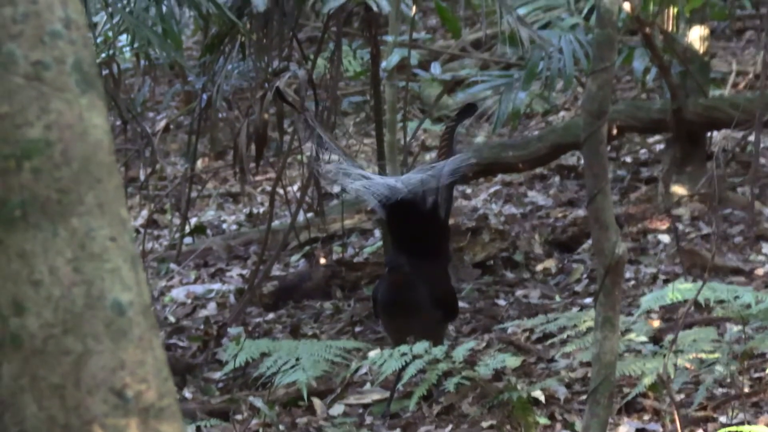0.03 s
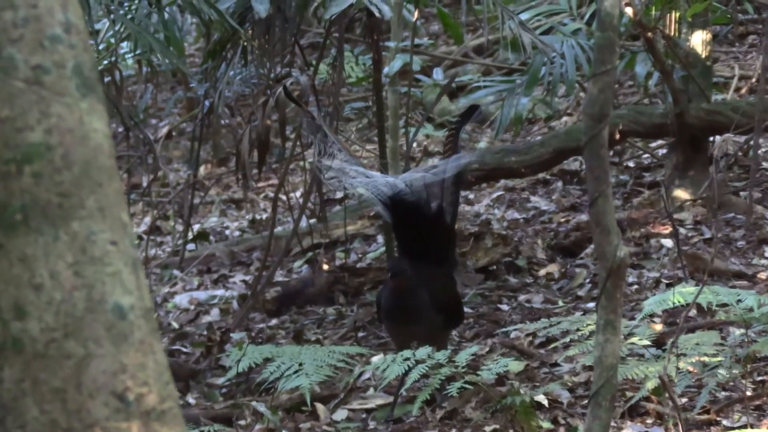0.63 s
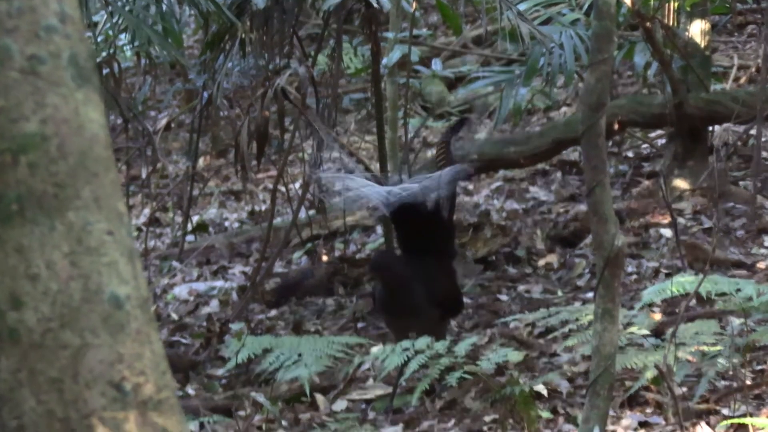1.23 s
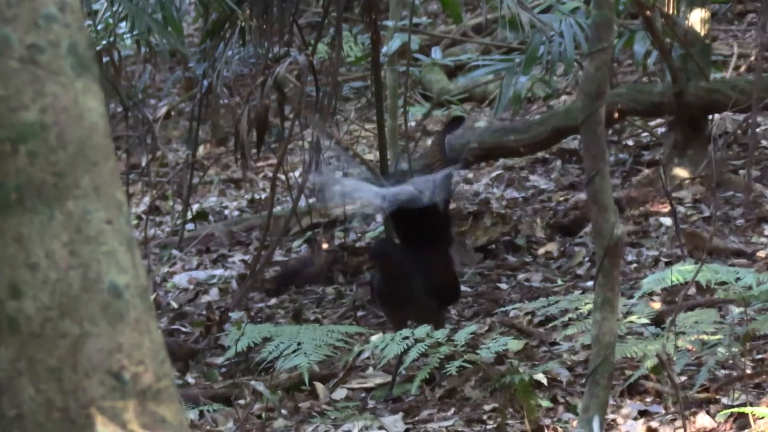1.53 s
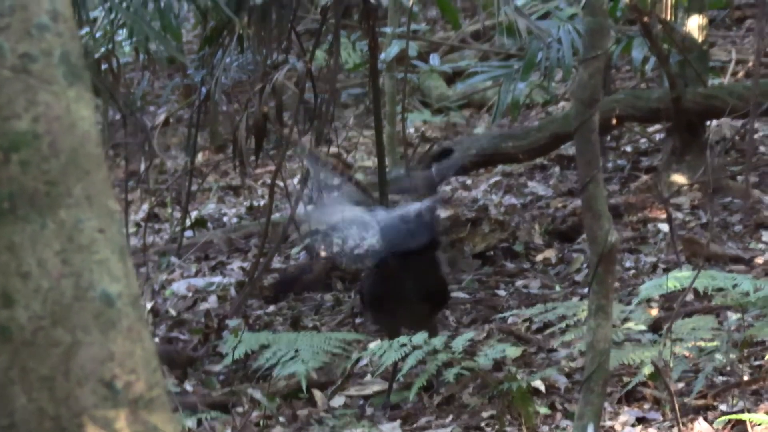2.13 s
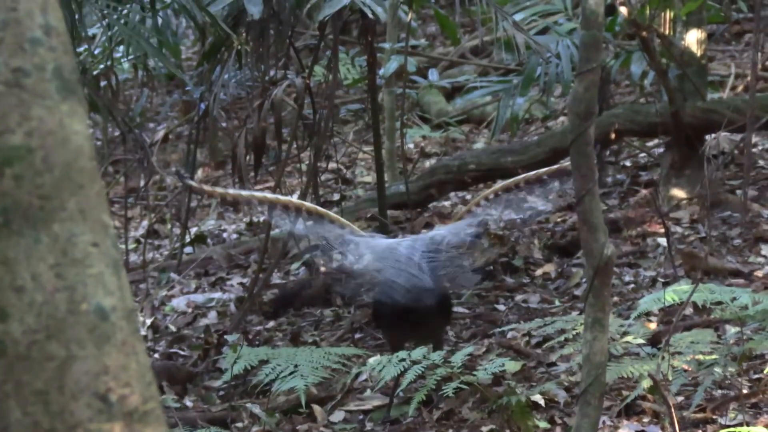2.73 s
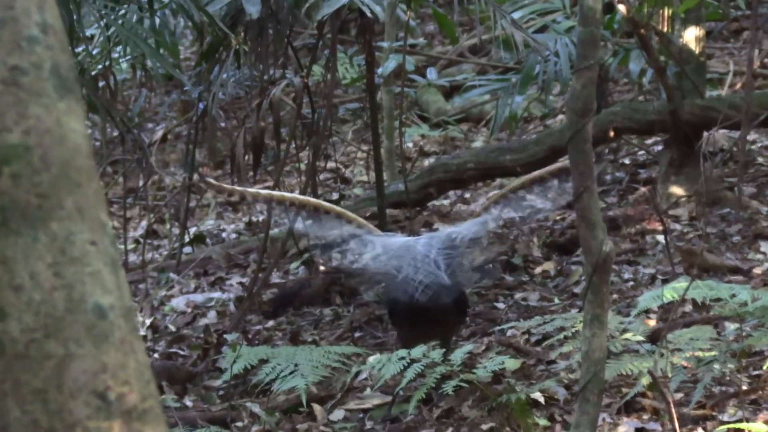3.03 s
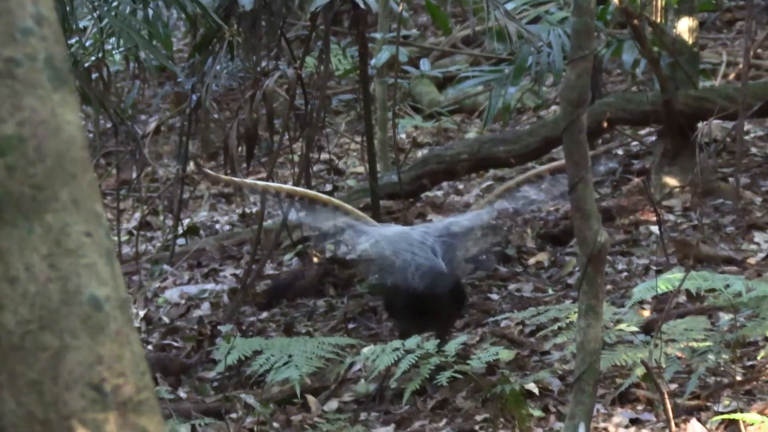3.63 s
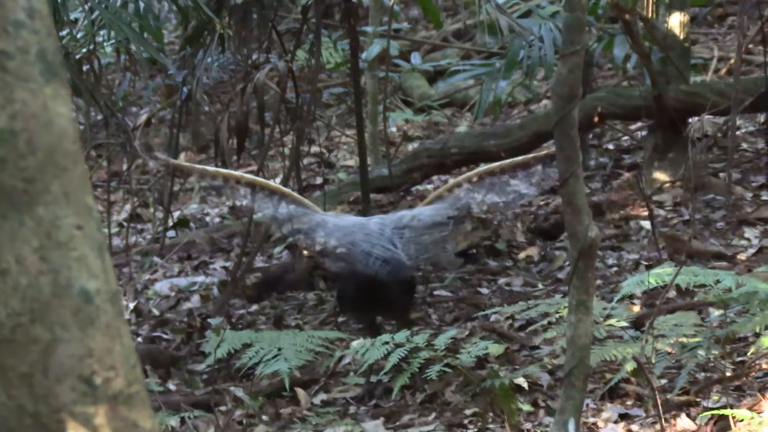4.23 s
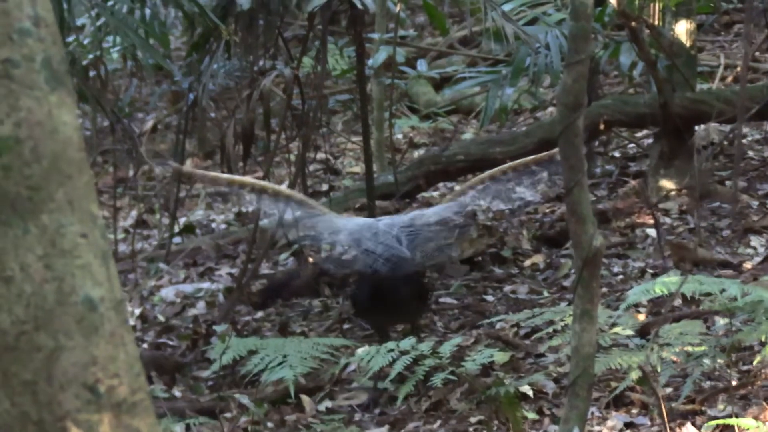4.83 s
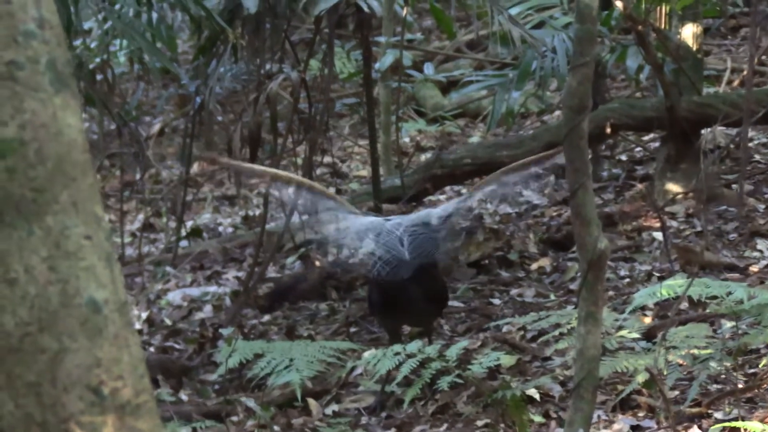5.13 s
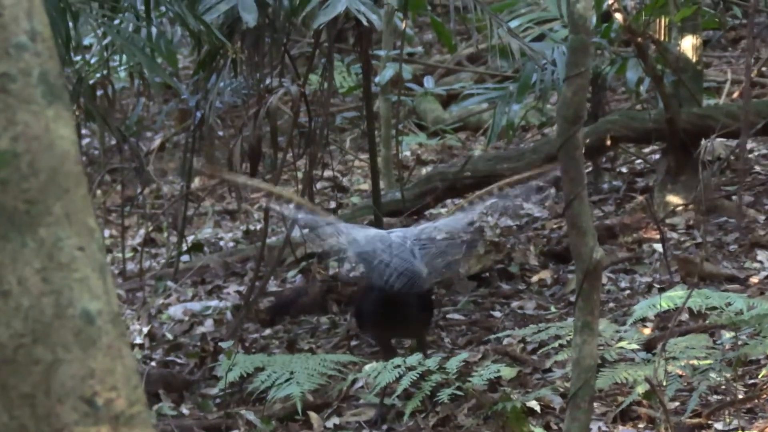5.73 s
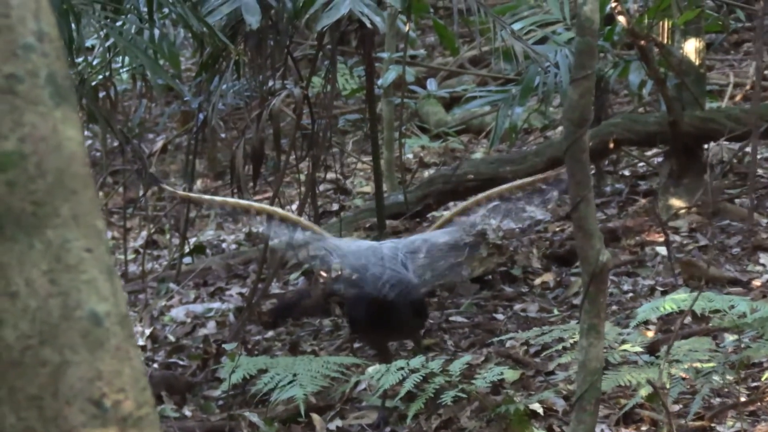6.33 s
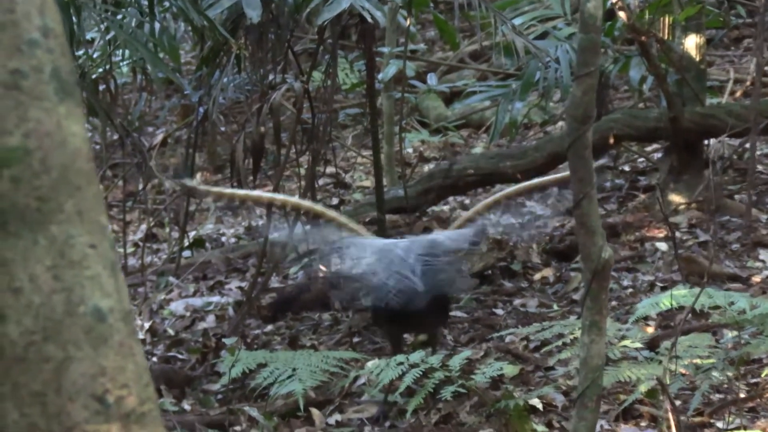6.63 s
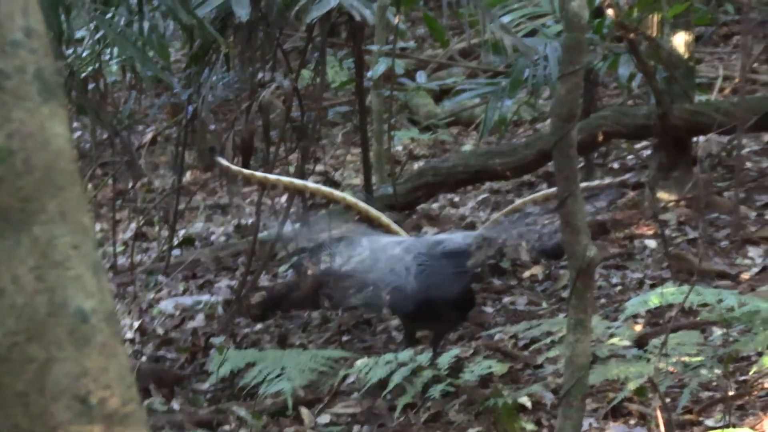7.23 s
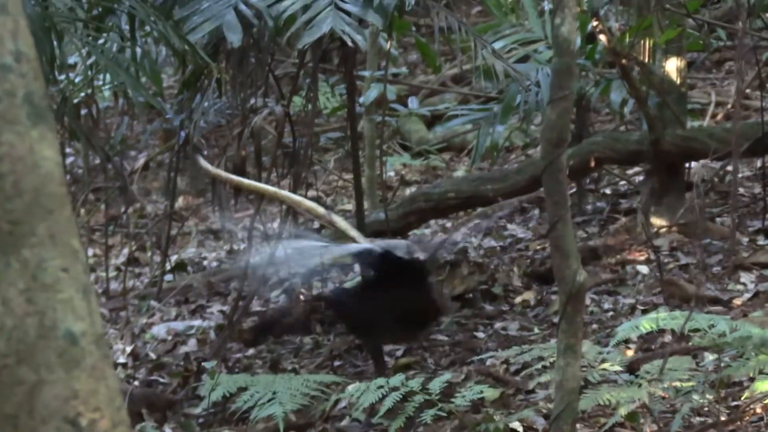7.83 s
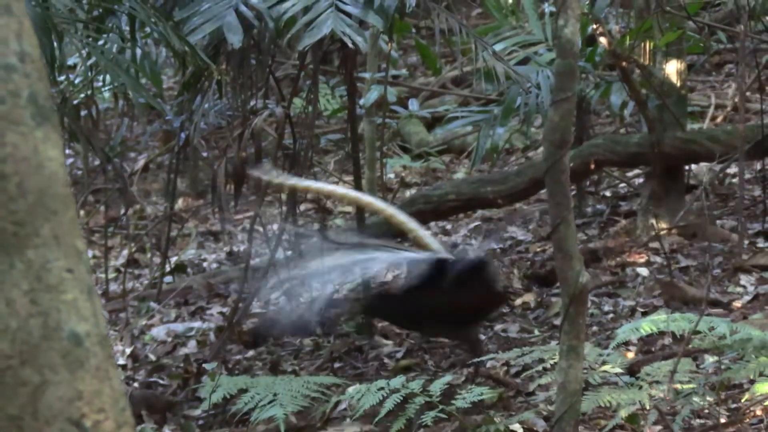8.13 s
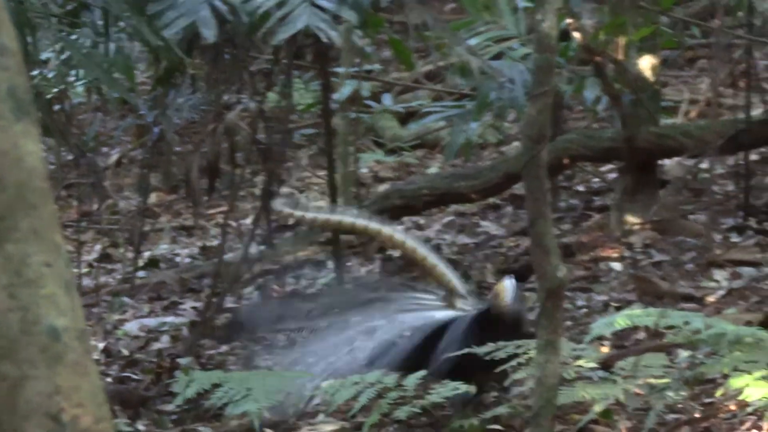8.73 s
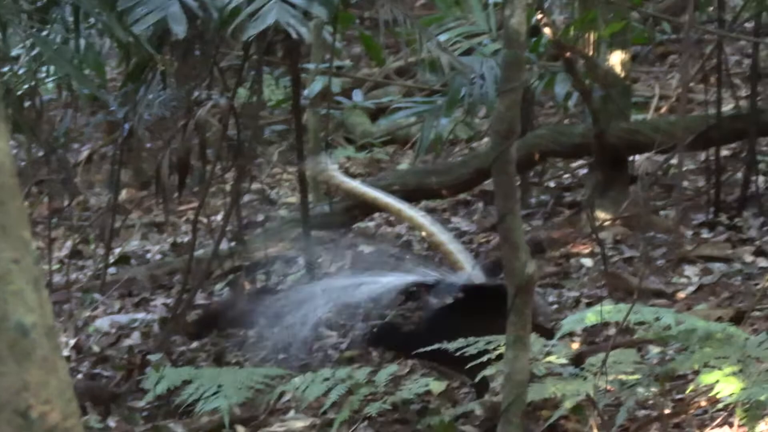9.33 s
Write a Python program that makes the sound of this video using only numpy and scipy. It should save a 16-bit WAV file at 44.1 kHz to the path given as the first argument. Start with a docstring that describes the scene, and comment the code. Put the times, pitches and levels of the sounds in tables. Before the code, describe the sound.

A soft rainforest hush with a faint low rumble runs throughout. For the first two seconds a lyrebird, straight ahead of the microphone, makes quiet throaty clucks and small rustles in the leaves, then a thin high chip. From about 2.5 to 4.8 seconds it gives a fast, even run of eleven calls, nearly five a second, each a whip-like snap, a metallic buzz and a rising whoop. Its feathers swish faintly around 5 seconds. A second run of seven, with harder snaps, lasts from 5.6 to 7 seconds. At 7.5 and 8 seconds come two loud ringing calls, each a high yelp with a quick falling trill, echoing for about a second among the trunks. From 8.6 to 9.4 seconds the bird steps through dry leaves and twigs with short crunches and a light swishing.

```python
"""Rainforest floor, a lyrebird displaying straight ahead of a stereo microphone. Soft clucks and thin
chips, two runs of snap-buzz-whoop, then two loud ringing calls: the whistles are nearly pure syrinx
tones, the clucks and buzzes rasp through throat resonances. Tail feathers swish between the runs and
the bird steps off through dry leaves. Near stems answer at once and far trunks scatter its sounds into
a long tail; behind it all lie the forest hush and a low rumble."""
import sys
import numpy as np
from scipy import signal
from scipy.fft import rfft, irfft, next_fast_len
from scipy.io import wavfile

SR = 44100
rng = np.random.default_rng(int(sys.argv[2]) if len(sys.argv) > 2 else 0)


def dump(signal):
    """Clip the signal to [-1, 1] and save it as 16-bit WAV at the path in sys.argv[1]."""
    limited = np.clip(np.atleast_2d(signal).T, -1, 1)
    pcm = np.round(limited * 32767).astype(np.int16)
    wavfile.write(sys.argv[1], SR, pcm)


N = 413216
TIME = np.arange(N) / SR

# one row a whoop: snap t/s, force/dB, crest of the glide after the snap/s, steep part of the glide/s
WHOOPS = [(2.4724, -34, 0.13, 0.029), (2.7043, -9, 0.11, 0.025), (2.9189, -10.5, 0.11, 0.017),
          (3.1308, -11, 0.11, 0.016), (3.346, -7, 0.11, 0.023), (3.5616, -5.5, 0.11, 0.013),
          (3.7711, -7.5, 0.11, 0.019), (3.9902, -10.5, 0.11, 0.021), (4.1982, -7, 0.11, 0.019),
          (4.41, -4.5, 0.11, 0.016), (4.6305, -8, 0.1, 0.02), (5.586, -20.5, .121, 0.018),
          (5.811, -4, .118, 0.023), (6.0329, -2.5, 0.11, 0.017), (6.2505, -1, .11, 0.021),
          (6.4613, -4.5, 0.11, 0.019), (6.6743, -5, 0.11, 0.019), (6.886, -5, 0.098, 0.014)]
# modes of the snap: f/Hz, level/dB, t60/s
SNAP_MODES = [(1564, -1.5, 0.0058), (2170, 11.5, 0.0029), (4050, 2, 0.0041), (6260, -25.5, 0.0013),
              (8070, -14, 0.0034)]
# the two loud calls: yelp t/s, starting f/Hz of the lead note, closing slur after the yelp/s
RINGING_CALLS = [(7.5169, 1710, .087), (8.0334, 1520, .08)]
# thin high chips: t/s, length/s, start f/Hz, middle f/Hz, end f/Hz, level/dB
CHIPS = [(0.02, 0.028, 6370, 5360, 4700, -46), (2.1062, 0.013, 6740, 5310, 7000, -15),
         (2.115, .012, 6100, 6950, 7000, -26), (2.296, .013, 7360, 7200, 7150, -34)]
# soft low murmurs: t/s, length/s, start f/Hz, end f/Hz, level/dB
MURMURS = [(.514, 0.015, 410, 450, -39), (.567, 0.016, 400, 470, -43), (1.004, 0.014, 537, 440, -38),
           (1.417, 0.024, 1380, 850, -38)]
# throaty clucks: t/s, length/s, start f/Hz, end f/Hz, level/dB, roughness 0-1
CLUCKS = [(.005, 0.04, 955, 784, -49, 0.7), (0.223, 0.023, 727, 770, -49, 0.4),
          (0.304, 0.026, 793, 695, -51.5, 0.6), (0.526, 0.019, 471, 427, -39, 0.76),
          (0.625, 0.032, 710, 623, -49, 0.5), (0.738, 0.031, 750, 1020, -44, 0),
          (0.784, 0.023, 868, 790, -42, 0.5), (0.869, 0.029, 434, 480, -31, 0.44)]
# feet on twigs and leaf litter: t/s, level/dB, decay of the crunch/s, treble limit f/Hz
STEPS = [(0.107, -36.5, 0.015, 12000), (.923, -33, 0.0047, 10000), (1.156, -43, .006, 8000),
         (1.216, -39, 0.0075, 8000), (1.69, -40.5, 0.0034, 8000), (1.769, -35.5, .01, 10000),
         (7.182, -41, 0.0067, 10000), (8.576, -30.5, 0.0017, 2400), (8.626, -18, 0.004, 7000),
         (8.793, -30, 0.0062, 7000), (9.0288, -20, 0.00099, 2420), (9.0836, -14.5, 0.004, 7000),
         (9.158, -27.5, 0.003, 9000), (9.237, -25.5, .0064, 8700), (9.331, -15.5, 0.0084, 3800)]
# feathers and leaves swishing: t/s, attack/s, hold/s, release/s, level/dB
SWISHES = [(0.099, .008, .004, .03, -43), (0.884, 0.044, .004, 0.018, -47.5),
           (1.75, 0.034, 0.082, 0.089, -52), (2.03, 0.076, .005, .01, -56),
           (4.92, .008, 0.028, 0.28, -44.5), (5.209, 0.066, 0.079, .035, -47),
           (7.064, 0.064, 0.056, 0.081, -51.5), (8.572, 0.0085, .16, 0.056, -51.5),
           (9.02, .01, 0.16, 0.098, -47.5)]
# contour of the rumble that swells while the bird dances: t/s, relative level/dB
RUMBLE_SWELL = [(0.0, -65), (0.42, -61.5), (2.27, -67), (2.92, -60), (3.18, -61.5), (8.92, -60),
                (9.37, -55)]

# harmonics of each tone, from the fundamental up: level/dB
WHOOP_HARMONICS = [-1, -76, -17.5, -78, -57]
SQUEAK_HARMONICS = [-11.5, 0, -13.5, -23]
YELP_HARMONICS = [-2.5, -23, -40, -41, -43]
PIP_HARMONICS = [-3.5, -32.5, -67, -41.5]
NOTE_HARMONICS = [-4, -30, -47, -49.5, -42.5, -35.5, -56]

# resonances of throat, beak and woody litter: f/Hz, width/Hz, level/dB
BUZZ_THROAT = [(1436, 193, 7), (2510, 110, 10.5), (4100, 2300, 1.5), (5130, 1240, 7), (7740, 600, 1.5),
               (12000, 3200, -19)]
CLUCK_THROAT = [(450, 120, -14), (890, 330, 12), (1740, 360, 20), (2650, 630, 2.5), (5150, 1100, -45)]
BEAK_MODES = [(10800, 4000, 7)]
TWIG_MODES = [(268, 31, -8), (539, 47, -2), (943, 610, -1.5), (1810, 650, 2.5), (2380, 700, 1),
              (4340, 1370, -8), (8540, 2800, -12.5)]

# noise spectra of call rasp, swish and hiss, forest hush and rumble: f/Hz, relative level/dB
SPRAY_COLOUR = [(2500, -7), (4000, 9.5), (8000, -3), (11000, -7), (14000, -15), (16000, -32)]
SWISH_COLOUR = [(530, -44), (900, -16), (1240, -24), (1290, -22), (1590, -8), (1820, -11.5), (2420, 5.5),
                (2930, -1.5), (3180, 2), (5700, -1.5), (9180, -13.5), (15500, -36)]
HUSH_COLOUR = [(15, -44), (25, -23.5), (170, -5.5), (437, -6.5), (500, -3.5), (637, -5.5), (1280, -7.5),
               (1390, -7.5), (1510, -9.5), (1640, -7), (2330, -15), (3780, -13.5), (7220, -20),
               (8730, -21.5), (15800, -37)]
RUMBLE_COLOUR = [(30, -39), (90, -8.5), (200, -2), (300, 2.5), (400, -9.5), (550, 2.5), (1000, -30),
                 (2500, -51)]

# leaves and stems close by throw back more treble than bass: f/Hz, level/dB
NEAR_COLOUR = [(200, -3.5), (1000, -2.5), (2000, 0), (3500, 1.5), (6000, 4.5), (12000, 3.5)]
# tail scattered by the far trunks: f/Hz, t60/s, level/dB
TRUNK_TAIL = [(200, 0.71, -24), (900, 0.53, -11), (1980, 1, -8.5), (4030, 0.81, -4), (7000, 0.9, -4.5),
              (14000, 0.33, -4)]

USUAL_FORCE_DB = -10
WHISTLE_DB, WHISTLE_FOLLOWS = -25, 0.092   # gain at the usual force; share of the force's swing
BUZZ_DB, BUZZ_FOLLOWS = -38.5, 0.3   # the same for buzz and squeak


def whoops(rest_hz=708, creep_hz=875, crest_hz=1490, top_hz=2500, lead_s=.105, swell_db_per_s=229):
    """The whistle leaves a low resting pitch and shoots up ever faster; its octave rings at the start."""
    out = np.zeros(N)
    shape = envelope(0.02, lead_s - .021, 0.023, -swell_db_per_s) * from_db(-swell_db_per_s * lead_s)
    octave = from_db(-16) * envelope(.012, .016, .024)
    t = np.arange(len(shape)) / SR - lead_s   # zero at the crest
    for s, force, crest, steep in WHOOPS:
        creep = (creep_hz - rest_hz) * np.exp(t / 0.033)
        leap = (crest_hz - creep_hz) * np.exp(.9 * t / np.where(t < 0, steep * .8, .0125))
        climb = np.minimum(leap / crest_hz, 1)   # the voice shakes more as it climbs
        hz = np.minimum(rest_hz * rng.normal(1, 0.0161) + creep + leap, top_hz)
        hz *= 1 + 0.018 * (1 + 2 * climb) * wander(len(t), 218.4)
        flutter = from_db(3 * climb * wander(len(t), 633))
        gain, start = effort(force, WHISTLE_DB, WHISTLE_FOLLOWS), s + crest - lead_s
        add(out, start, gain * shape * flutter * whistle(hz, WHOOP_HARMONICS))
        add(out, start + .006, gain * octave * whistle(2 * hz[:len(octave)], [0]))
    return out


def snaps(gain_db=-4, scatter_db=3.5, knock_hz=260, knock_db=-38, knock_s=0.014):
    """A whip-like click over a faint low knock opens each whoop."""
    out, t = np.zeros(N), np.arange(SR // 25) / SR
    low_cut = signal.butter(4, 800, "high", fs=SR, output="sos")
    knock = from_db(knock_db) * np.sin(2 * np.pi * knock_hz * t) * np.exp(-t / knock_s)
    for s, force, *_ in WHOOPS:
        click = 0
        for hz, db, t60 in SNAP_MODES:
            decay = from_db(db + rng.normal(0, scatter_db) - 60 * t / t60)
            click += decay * np.sin(2 * np.pi * hz * rng.normal(1, 0.062) * t)
        click = signal.sosfilt(low_cut, click * (1 - np.exp(-t / 0.00047)))
        add(out, s, from_db(force + gain_db) * (click / np.abs(click).max() + knock))
    return out


def buzzes(pulse_hz=155, gain_db=4.5):
    """Between snap and whoop a rasp rings in throat resonances that sag a little."""
    out, shape = np.zeros(N), envelope(0.00084, 0.051, 0.025, sag_db_per_s=206)
    pitch_ratio = 1.04 - .6 * np.arange(len(shape)) / SR
    for s, force, *_ in WHOOPS:
        hz = pulse_hz * (1 + 0.031 * wander(2 * len(shape), 100))
        rasp = rms_one(resonate(pulses(hz, rough=1), BUZZ_THROAT))
        sagging = np.interp(np.cumsum(pitch_ratio) * rng.normal(1, .015), np.arange(len(rasp)), rasp)
        add(out, s, effort(force, BUZZ_DB + gain_db, BUZZ_FOLLOWS) * shape * sagging)
    return out


def squeaks(pitch_hz=2983, scoop_hz=449.5, sag_hz_per_s=2700, settle_s=0.038, gain_db=1):
    """A metallic squeal, hoarse at first, slides up, settles and sinks over each buzz."""
    out, shape = np.zeros(N), envelope(0.017, 0.072, 0.026, sag_db_per_s=64)
    t = np.arange(len(shape)) / SR
    hz = pitch_hz - scoop_hz * np.exp(-t / 0.011) - sag_hz_per_s * t
    for s, force, *_ in WHOOPS:
        jitter = (.022 + .06 * np.exp(-t / settle_s)) * wander(len(t), 1100) + .02 * wander(len(t), 25)
        tone = whistle(hz * (1 + jitter), SQUEAK_HARMONICS)
        flutter = from_db(2.5 * wander(len(t), 300))
        add(out, s + .003, effort(force, BUZZ_DB + gain_db, BUZZ_FOLLOWS) * shape * flutter * tone)
    return out


def opening_chirps(pause_s=.5):
    """The first snap of each run, after a pause, comes with a quick falling chirp."""
    out, previous = np.zeros(N), 0
    for s, *_ in WHOOPS:
        if s - previous > pause_s:
            add(out, s - 0.0011, note(0.0053, [2850, 1150], -27, PIP_HARMONICS))
        previous = s
    return out


def crest_rasps(centre_hz=1600, gain_db=-8.5):
    """At the crest of each whoop the whistle breaks into a short hoarse rasp."""
    out, shape = np.zeros(N), envelope(0.034, 0.0074, 0.035)
    for s, force, crest, _ in WHOOPS:
        hz = centre_hz * np.exp(0.211 * wander(len(shape), 1812))
        gain = effort(force, WHISTLE_DB + gain_db, WHISTLE_FOLLOWS)
        add(out, s + crest - .012, gain * shape * whistle(hz, [0]))
    return out


def whoop_hiss(opening_db=-43, closing_db=-31):
    """A short grainy hiss opens and closes every whoop."""
    level = np.zeros(N)
    for s, _, crest, _ in WHOOPS:
        add(level, s + 0.0014, from_db(opening_db) * envelope(0.0027, 0.016, .05))
        add(level, s + crest - .008, from_db(closing_db) * envelope(0.033, 0.06, 0.044, sag_db_per_s=207))
    return level * grainy_noise(SWISH_COLOUR, grain_db=2.5)


def after_notes(delay_s=.052, length_s=0.032, start_hz=780, end_hz=1400, gain_db=-15):
    """A quick hoarse upward flick trails each whoop."""
    out, size = np.zeros(N), int(length_s * SR)
    for s, force, crest, _ in WHOOPS:
        hz = np.geomspace(start_hz, end_hz, size) * (1 + .2 * wander(size, 1600))
        flick = arch(size, 0.16) * whistle(hz, [0, 4.5, -13, 1.5])
        gain = effort(force, WHISTLE_DB + gain_db, WHISTLE_FOLLOWS)
        add(out, s + crest + delay_s + rng.normal(0, .002), gain * flick)
    return out


def ringing_calls(pips=5, pip_hz=2064, step_hz=45, fall_hz=201, spacing_s=.0168, hurry_s=.0012):
    """A soft lead note, a high yelp, a hurrying trill of falling pips, and a faint slur downward."""
    out = np.zeros(N)
    for s, lead_start_hz, slur_s in RINGING_CALLS:
        lead = note(0.023, [lead_start_hz, 1501, 1501], -8.5, peak=0.67, waver=0.01)
        yelp = note(0.012, [2480, 2768, 2460], -2, YELP_HARMONICS, peak=0.29, fullness=0.58, waver=0.041)
        add(out, s - .038, lead)
        add(out, s, yelp)
        at = s + .027
        for k in range(pips):
            hz = pip_hz - step_hz * k
            db = 1 if k < pips - 1 else -1.5
            add(out, at, note(.0062, [hz + fall_hz, hz - fall_hz], db, PIP_HARMONICS, waver=0.012))
            at += spacing_s - hurry_s * k
        add(out, s + slur_s, note(0.0204, [1580, 970], -19.5))
    return out


def call_spray(yelp_db=-36, trill_db=-37):
    """Bright rasp bursts out with each yelp and swells again as the trill ends."""
    level = np.zeros(N)
    for s, *_ in RINGING_CALLS:
        add(level, s, from_db(yelp_db) * envelope(0.0055, 0.009, 0.056))
        add(level, s + 0.057, from_db(trill_db) * envelope(.025, 0.022, 0.16, sag_db_per_s=67))
    return level * grainy_noise(SPRAY_COLOUR, grain_db=1.5)


def chips_and_murmurs():
    """Brief bent whistles, thin and high or soft and low."""
    out = np.zeros(N)
    for s, length, *pitches, db in CHIPS + MURMURS:
        add(out, s, note(length, pitches, db))
    return out


def beak(voice):
    """The beak's bright resonance lifts the high overtones."""
    return voice + resonate(voice, BEAK_MODES)


def clucks():
    """Short rough pulse trains ring through the throat."""
    out = np.zeros(N)
    for s, length, start_hz, end_hz, db, rough in CLUCKS:
        size = int(length * SR)
        voice = resonate(pulses(np.linspace(start_hz, end_hz, size), rough), CLUCK_THROAT)
        add(out, s, from_db(db) * arch(size, 0.57) * rms_one(voice))
    return out


def steps(gain_db=1.5, settle_db=-30, settle_s=0.014):
    """Each footfall is a dying crunch of twigs; the leaves crackle as they settle."""
    out, t = np.zeros(N), np.arange(SR // 6) / SR
    for s, db, decay_s, top_hz in STEPS:
        breaks = np.exp(-t / decay_s)
        settling = from_db(settle_db + 4 * wander(len(t), 900)) * np.exp(-t / settle_s)
        crunch = resonate(rng.standard_normal(len(t)) * (breaks + settling), TWIG_MODES)
        crunch = signal.sosfilt(signal.butter(2, top_hz, fs=SR, output="sos"), crunch)
        add(out, s, from_db(db + gain_db) * crunch / np.abs(crunch).max())
    return out


def swishes():
    """Feathers and leaves brush with a smooth fine hiss."""
    level = np.zeros(N)
    for s, attack, hold, release, db in SWISHES:
        add(level, s, from_db(db) * envelope(attack, hold, release))
    return level * grainy_noise(SWISH_COLOUR, grain_db=1)


def ground_bounce(x, lag_s=0.000487, bounce_db=-26):
    """The bounce off the floor reaches the microphone just behind the direct sound and combs it gently."""
    bounce = from_db(bounce_db)
    return (x + bounce * np.interp(TIME - lag_s, TIME, x)) / (1 + bounce / 2)


def forest_echoes(x, gap_s=.004, near_db=-5.5, near_s=.028, build_s=0.0026, lumpy_db=5.5):
    """Ground and near stems answer at once; far trunks give a lumpy, slowly dying tail."""
    t = np.arange(SR * 5 // 4) / SR
    centres, t60s, levels = np.transpose(TRUNK_TAIL)
    edges = np.geomspace(100, 16000, 9)
    echoes = rng.standard_normal((2, len(t))) * (t > gap_s)   # mid and side
    echoes *= rms_one(from_db(lumpy_db * wander(len(t), 700)))
    near = from_db(near_db) * np.exp(-t / near_s) * np.sqrt(2 / near_s / SR)
    spectrum, bins, response = rfft(echoes), np.fft.rfftfreq(len(t), 1 / SR), 0
    for low, high in zip(edges, edges[1:]):
        hz = np.sqrt(low * high)
        t60, db = (np.interp(np.log(hz), np.log(centres), column) for column in (t60s, levels))
        far = from_db(-60 * t / t60) * (1 - np.exp(-t / build_s))
        far *= from_db(db) / np.linalg.norm(far)
        near_gain = from_db(np.interp(hz, *np.transpose(NEAR_COLOUR)))
        band = irfft(spectrum * ((bins >= low) & (bins < high)), len(t))
        response += band * np.hypot(near * near_gain, far)
    mid, side = signal.fftconvolve(x[None], response, axes=1)[:, :N]
    return stereo(mid, side, side_db=-4.5)


def forest_hush(start_db=-57, rise_db_per_s=0.57):
    """A soft, slowly growing hush all round the microphone."""
    hush = stereo(noise(HUSH_COLOUR), noise(HUSH_COLOUR), side_db=-6)
    return from_db(start_db + rise_db_per_s * TIME) * hush


def rumble(mean_db=-61, swing=1.23):
    """A low rumble in the centre swells while the bird dances."""
    swell_db = np.interp(TIME, *np.transpose(RUMBLE_SWELL))
    return from_db(mean_db + swing * (swell_db - swell_db.mean())) * noise(RUMBLE_COLOUR)


def effort(force_db, usual_db, follows):
    """Gain of the voice: a harder snap brings a louder one."""
    return from_db(usual_db + follows * (force_db - USUAL_FORCE_DB))


def note(length_s, pitches_hz, db, harmonics_db=NOTE_HARMONICS, peak=0.47, fullness=1.0, waver=0.017):
    """A short rounded whistle that bends through two or three pitches."""
    size = int(length_s * SR)
    bend = np.polyfit(np.linspace(0, 1, len(pitches_hz)), pitches_hz, len(pitches_hz) - 1)
    hz = np.polyval(bend, np.linspace(0, 1, size)) * (1 + waver * wander(size, 2910))
    return from_db(db) * arch(size, peak) ** fullness * whistle(hz, harmonics_db)


def whistle(hz, harmonics_db):
    """A syrinx tone: sine harmonics on a moving pitch."""
    phase = 2 * np.pi * np.cumsum(hz) / SR
    return sum(from_db(db) * np.sin(k * phase) * (k * hz < SR / 2) for k, db in enumerate(harmonics_db, 1))


def pulses(hz, rough):
    """One pulse a cycle, giving way to turbulence gated by that cycle as rough goes from 0 to 1."""
    cycles = np.cumsum(hz) / SR
    clicks = np.diff(np.floor(cycles), prepend=-1)
    turbulence = rng.standard_normal(len(hz)) * np.cos(np.pi * cycles) ** 2
    return (1 - rough) * rms_one(clicks) + rough * rms_one(turbulence)


def resonate(x, modes):
    """Parallel resonances with alternating signs."""
    out = 0
    for k, (hz, width, db) in enumerate(modes):
        r = np.exp(-np.pi * width / SR)
        ring = signal.lfilter([1, 0, -1], [1, -2 * r * np.cos(2 * np.pi * hz / SR), r * r], x)
        out += (-1) ** k * from_db(db) * (1 - r * r) / 2 * ring
    return out


def noise(colour):
    """Noise of unit rms with the given spectrum."""
    hz, db = np.transpose(colour)
    size = next_fast_len(N, real=True)
    gain = from_db(np.interp(np.log(np.fft.rfftfreq(size, 1 / SR) + 1), np.log(hz), db))
    return rms_one(irfft(rfft(rng.standard_normal(size)) * gain, size)[:N])


def grainy_noise(colour, grain_db):
    """Coloured noise whose level flickers quickly."""
    return noise(colour) * from_db(grain_db * wander(N, 400))


def wander(size, hz):
    """A random line through hz normal draws a second."""
    position = np.arange(size) * hz / SR
    count = int(position[-1]) + 2
    return np.interp(position, np.arange(count), rng.standard_normal(count))


def envelope(attack_s, hold_s, release_s, sag_db_per_s=0):
    """A smooth rise, hold and fall, tilted by the sag; a negative sag swells."""
    t = np.arange(0, attack_s + hold_s + release_s, 1 / SR)
    gate = np.clip(np.minimum(t / attack_s, (t[-1] - t) / release_s), 0, 1)
    return np.sin(gate * np.pi / 2) ** 2 * from_db(-sag_db_per_s * t)


def arch(size, peak):
    """A rounded rise and fall that tops at the given share of its length."""
    return np.sin(np.interp(np.arange(size) / size, [0, peak, 1], [0, np.pi / 2, np.pi]))


def stereo(mid, side, side_db):
    """Left and right from a mid and a weaker side signal."""
    return mid + from_db(side_db) * side * np.array([[1], [-1]])


def from_db(db):
    """Decibels to gain."""
    return 10 ** (np.asarray(db) / 20)


def rms_one(x):
    """Scale to unit rms."""
    return x / np.sqrt(np.mean(x ** 2) + 1e-20)


def add(out, s, sound):
    """Mix a sound in at time s."""
    at = max(round(s * SR), 0)
    out[at:at + len(sound)] += sound[:max(N - at, 0)]


def scene():
    """The bird straight ahead of the microphone, the forest around it."""
    runs = opening_chirps() + snaps() + buzzes() + squeaks()
    runs += whoops() + crest_rasps() + whoop_hiss() + after_notes()
    calls = beak(ringing_calls() + chips_and_murmurs()) + call_spray() + clucks()
    low_cut = signal.butter(1, 200, "high", fs=SR, output="sos")   # a small body radiates little bass
    bird = signal.sosfilt(low_cut, ground_bounce(runs + calls + steps() + swishes()))
    background = forest_hush() + rumble()
    return bird + forest_echoes(bird) + background


def record(dry, soften_hz=13500, ceiling=.95, cutoff_hz=15500):
    """The microphone softens the highest treble and rounds the loudest peaks; the top is cut."""
    soft = signal.sosfilt(signal.butter(2, soften_hz, fs=SR, output="sos"), dry)
    rounded = soft / (1 + (soft / ceiling) ** 8) ** (1 / 8)
    return signal.sosfilt(signal.ellip(10, .1, 90, cutoff_hz, fs=SR, output="sos"), rounded)


dry = scene()
out = record(dry)
dump(out)
```